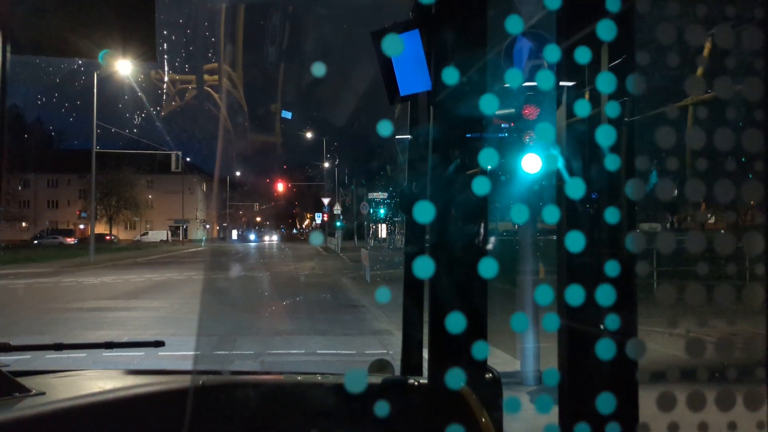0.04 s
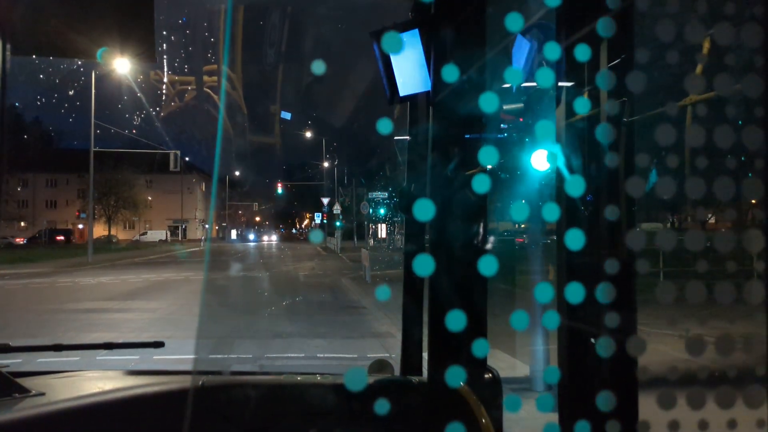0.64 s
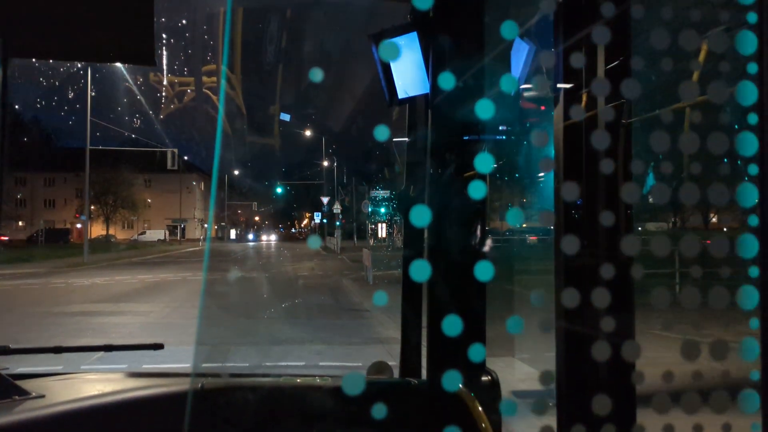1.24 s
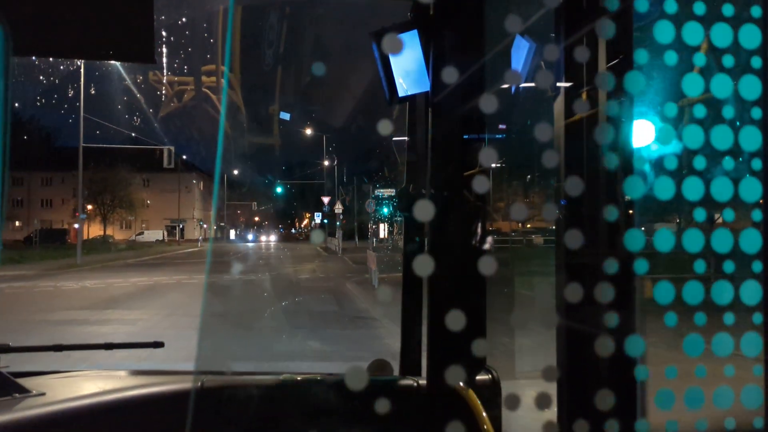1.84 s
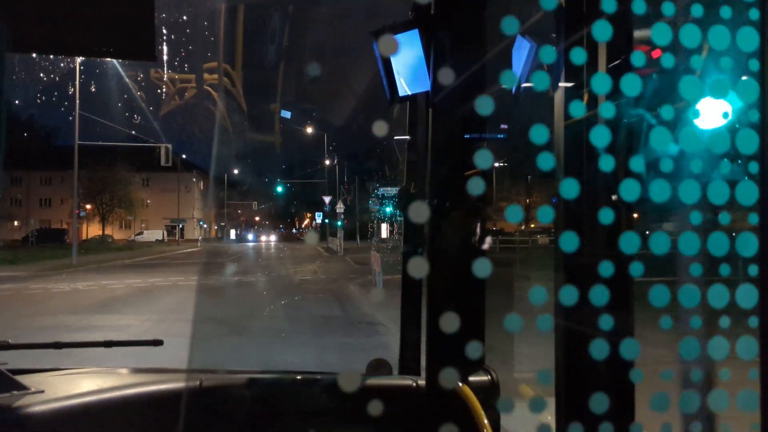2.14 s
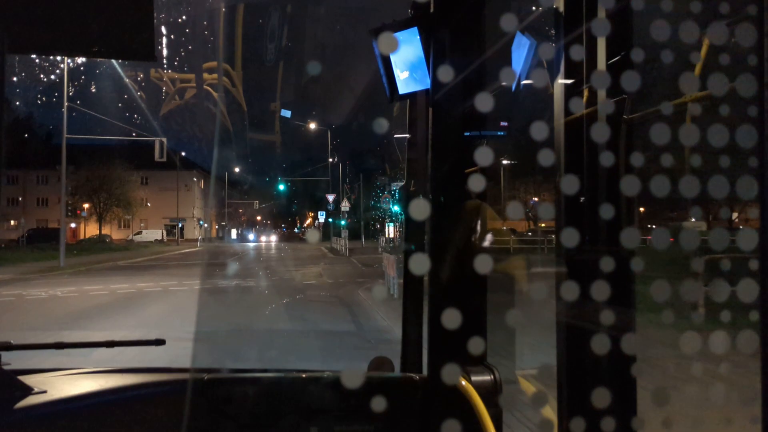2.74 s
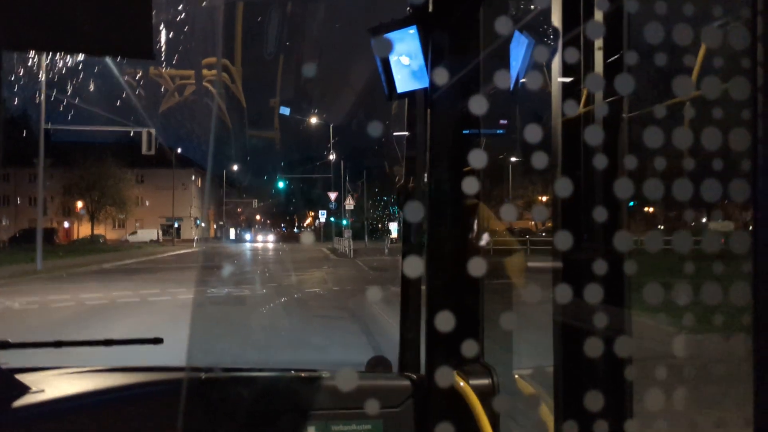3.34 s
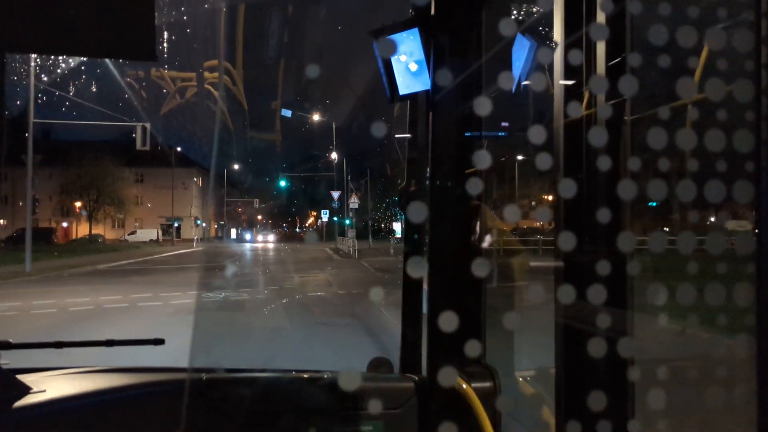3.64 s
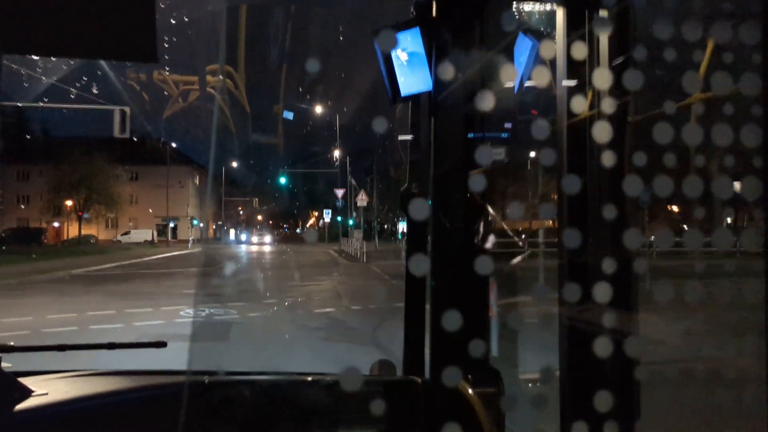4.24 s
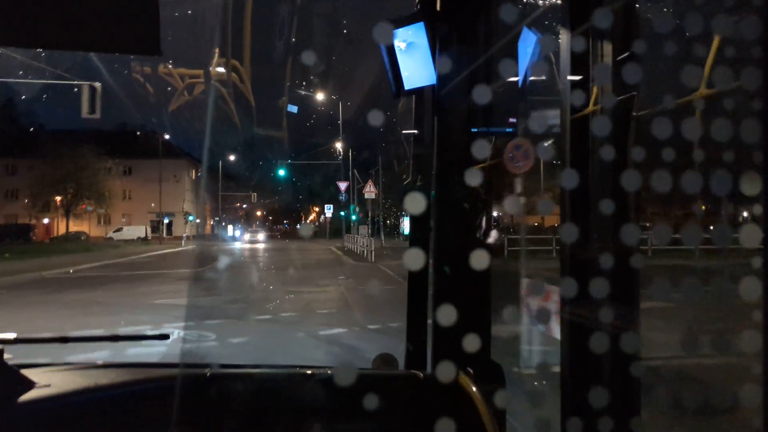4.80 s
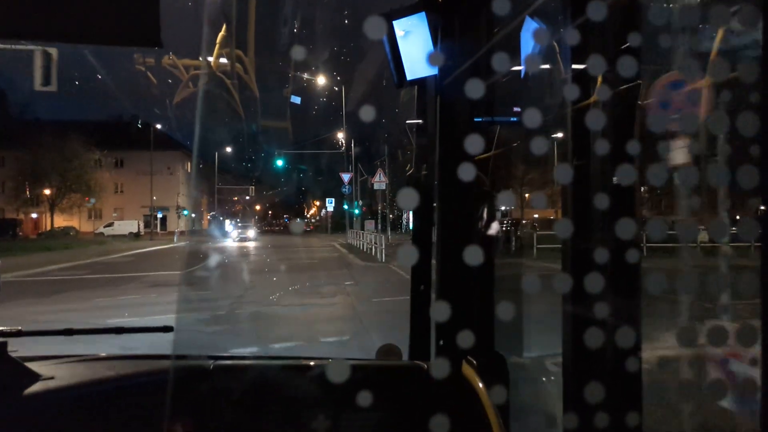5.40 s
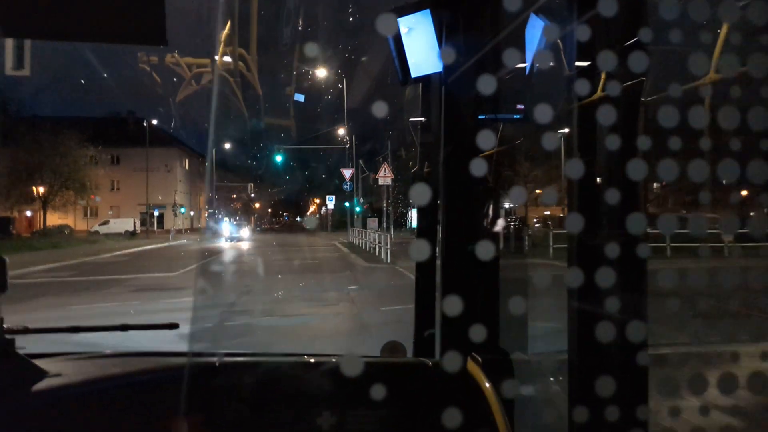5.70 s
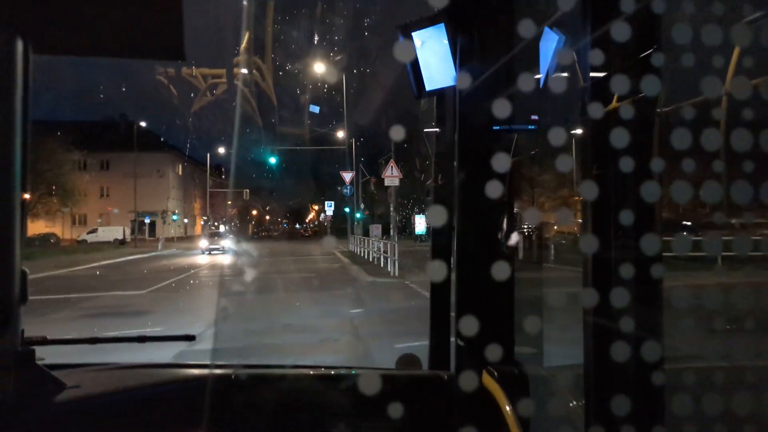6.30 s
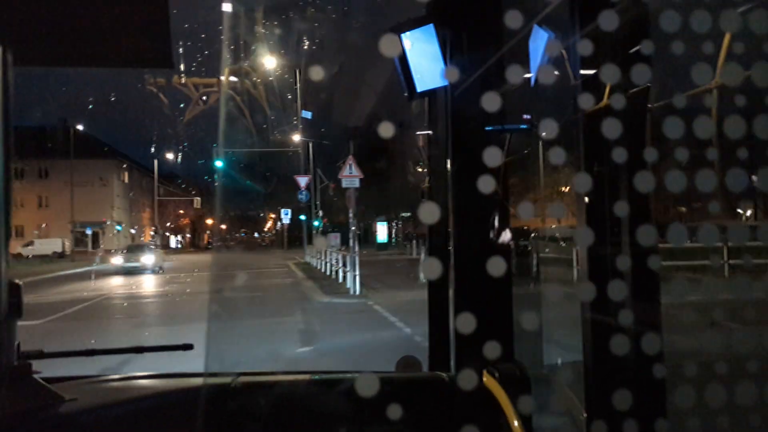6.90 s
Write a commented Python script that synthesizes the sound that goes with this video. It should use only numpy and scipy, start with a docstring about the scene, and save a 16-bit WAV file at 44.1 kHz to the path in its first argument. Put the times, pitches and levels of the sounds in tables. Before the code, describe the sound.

Inside a city bus, the engine booms up through a gear and shifts, over tyre rumble, whining ventilation and ticking door fittings.

```python
"""A city bus engine, heard from inside near the front door, pulls up through a gear and shifts up,
booming as its orders sweep through the cabin's standing waves. The tyres rumble and thump over seams.
A ventilation blower hisses and whines, sagging a little after the shift. Loose door fittings tick,
a rubber seal squeaks on glass and the latch snaps near the end."""
import sys
import numpy as np
from scipy import signal
from scipy.io import wavfile

SR = 44100
rng = np.random.default_rng(int(sys.argv[2]) if len(sys.argv) > 2 else 0)


def waveform_to_disk(signal):
    """Save audio, clipped to [-1, 1], as 16-bit WAV at the path in sys.argv[1]."""
    frames = np.transpose(np.atleast_2d(signal))
    scaled = np.clip(frames, -1, 1) * 32767
    samples = np.round(scaled).astype(np.int16)
    wavfile.write(sys.argv[1], SR, samples)


N = 315315
CUTOFF_HZ = 15550

# roughness of the asphalt: (time [s], rumble level [dB])
ROAD_ROUGHNESS = [(0, -32.5), (1.2, -34.5), (2.2, -31.5), (2.65, -26), (3.1, -30.5), (3.35, -23),
                  (3.9, -25), (4.3, -21.5), (5, -26.5), (5.7, -29.5), (5.9, -29.5), (6.5, -28.5),
                  (6.85, -28), (7.15, -30)]
# wheels hitting seams in the road: (time [s], strength [dB])
SEAMS = [(3.309, -11.5), (3.383, -23), (3.445, -14.5), (4.429, -15.5), (4.503, -12.5), (4.747, -17),
         (5.173, -11.5), (5.231, -10), (5.299, -17.5), (5.381, -14), (5.682, -17), (6.118, -11.5),
         (6.171, -12.5)]
# wall panel resonance that colours the engine: (frequency [Hz], width [Hz], boost [dB])
WALL_PANEL = (324, 36, 13)


def from_db(db):
    """Decibels to gain."""
    return 10 ** (np.asarray(db) / 20)


def rms_one(x):
    """Scale to an rms of 1."""
    return x / np.sqrt(np.mean(x ** 2) + 1e-20)


def in_time(rows):
    """Each column of an automation curve at every sample."""
    times, *columns = np.transpose(rows)
    return [np.interp(np.arange(N) / SR, times, column) for column in columns]


def at_hz(points, hz):
    """Read a spectrum on a log-frequency axis."""
    freqs, values = np.transpose(points)
    return np.interp(np.log(hz), np.log(freqs), values)


def pan(db):
    """Left and right gains for a level difference."""
    return from_db(np.array([[.5], [-.5]]) * db)


def drift(rate):
    """Smooth random modulation, rms 1, rolling off above about `rate` Hz."""
    hop, settle = 40, 2000
    pole = np.exp(-2 * np.pi * hop * rate / SR)
    noise = rng.standard_normal(N // hop + settle + 2)
    slow = signal.lfilter([1], [1, -2 * pole, pole * pole], noise)[settle:]
    return np.interp(np.arange(N) / hop, np.arange(len(slow)), rms_one(slow))


def band(x, low, high, order=2):
    """Butterworth band-pass."""
    return signal.sosfilt(signal.butter(order, [low, high], "band", fs=SR, output="sos"), x + 1e-18)


def swell(start_s, attack_s, t60, hold_s=0):
    """Envelope that rises to 1, holds and dies away."""
    age = np.arange(N) / SR - start_s
    decay = from_db(-60 * np.maximum(age - attack_s - hold_s, 0) / t60)
    return np.clip(age / attack_s, 0, 1) ** 2 * decay


def cabin_noise(spectrum, flicker_db):
    """Flickering third-octave noise bands, nearly mono in the bass and diffuse in the treble; rms 1."""
    # stereo image of the cabin: (frequency [Hz], left-right correlation [-1..1])
    likeness = [(60, .993), (130, .965), (250, .68), (550, 0.3), (1000, 0), (1500, -0.3), (2500, .05),
                (5000, -0.14), (14000, 0)]
    # its balance: (frequency [Hz], left over right [dB])
    balance = [(60, -1), (140, -1.5), (300, 3), (600, -1), (1300, 0.2), (2800, 0.5), (5500, 0.5), (9000, 0),
               (13000, -2)]
    edges = 25 * 2 ** (np.arange(29) / 3)
    white, out = rng.standard_normal((2, 2, N)), 0
    for k, (low, high) in enumerate(zip(edges, edges[1:])):
        hz = np.sqrt(low * high)
        if spectrum[0][0] <= hz <= spectrum[-1][0]:
            mid, side = band(white[k % 2], low, high, order=3)
            alike = at_hz(likeness, hz)
            gain = from_db(at_hz(spectrum, hz) + flicker_db * drift(20)) * pan(at_hz(balance, hz))
            out = out + gain * (np.sqrt(1 + alike) * mid + np.sqrt(1 - alike) * side * [[1], [-1]])
    return rms_one(out)


def cabin_reverb(x, t60, wet_db):
    """Direct sound plus a dense tail of reflections off glass and panels, different at each side."""
    t = np.arange(SR // 2) / SR
    tails = rng.standard_normal((2, len(t))) * from_db(-60 * t / t60)
    tails /= np.sqrt(np.sum(tails ** 2, axis=1, keepdims=True))
    return x + from_db(wet_db) * signal.fftconvolve(x, tails, axes=1)[:, :N]


def blower_shaft(wobble=0.000314):
    """The blower's own clock [s], which falls behind as it slows, and how far it has sagged (0-1)."""
    # blower motor speed: (time [s], share of full speed [0..1])
    speed_curve = [(0, 1), (4.65, 1), (4.8, .9925), (5.5, .9872), (7.15, .9865)]
    speed, = in_time(speed_curve)
    clock = np.cumsum(speed * (1 + wobble * drift(3.33))) / SR
    return clock, (1 - speed) / (1 - speed.min())


def motor_buzz(rush, clock, slowed, shaft_hz=54.65, low_hz=2600, size=4096):
    """Part of the hiss repeats on every turn of the motor: a comb of fine lines in the treble."""
    treble = signal.sosfiltfilt(signal.butter(3, low_hz, "high", fs=SR, output="sos"), rush)
    one_turn = signal.resample(treble[:, SR:SR + round(SR / shaft_hz)], size, axis=1)
    turns = clock * shaft_hz
    buzz = np.array([np.interp(turns, np.arange(size) / size, side, period=1) for side in one_turn])
    share = .41 - .12 * slowed   # of the treble's power
    return rush + (np.sqrt(1 - share) - 1) * treble + np.sqrt(share) * buzz


def vent_air(clock, slowed, level_db=-39, follows_road=0.11, treble_hz=6500):
    """Air rush and motor buzz leave through the vents, which colour them; rough road adds a little."""
    # spectrum of the air rush: (frequency [Hz], relative density [dB])
    rush_spectrum = [(200, 3), (450, -3), (600, 1), (800, -4), (1080, 1), (1400, -5), (1750, -6),
                     (2200, -9), (2850, -14.5), (4400, -15.5), (5700, -19.5), (9200, -27), (12000, -30.5),
                     (15500, -35)]
    # vent resonances: (frequency [Hz], width [Hz], boost [dB])
    vent_peaks = [(1540, 70, 5), (3970, 650, 0.5), (4750, 400, 2), (6620, 980, 4.5), (10800, 900, 5.5),
                  (13350, 1200, 7)]
    # the hiss brightens and dulls: (time [s], treble gain [dB])
    brightness = [(0, -0.3), (1.7, 2.1), (3.05, 1), (3.14, -1), (3.27, -1), (3.35, 2), (3.6, 1.5),
                  (4.4, 0.5), (5.2, -0.5), (5.8, -1), (6.4, -2), (7.15, -1)]
    road_db, = in_time(ROAD_ROUGHNESS)
    lift_db, = in_time(brightness)
    flow_db = level_db + follows_road * (road_db - road_db.mean())
    rush = motor_buzz(cabin_noise(rush_spectrum, flicker_db=1), clock, slowed)
    for hz, width, db in vent_peaks:
        rush = rush + (from_db(db) - 1) * band(rush, hz - width / 2, hz + width / 2, order=1)
    treble = signal.sosfilt(signal.butter(1, treble_hz, "high", fs=SR, output="sos"), rush)
    return from_db(flow_db) * (rush + (from_db(lift_db) - 1) * treble)


def blower_whine(clock, slowed, trim_db=-0.7, tilt_db_per_octave=0.67, waver_db=1.1, flutter_db=1.5):
    """Wavering tones ride on one shaft speed, and close pairs beat."""
    # blower tones: (full-speed pitch [Hz], full-speed level [dB], slowed level [dB],
    # left over right [dB], left phase lead [rad])
    tones = [(533, -57, -59, -2, -0.1), (652, -56, -51.5, -3, 1.0), (664, -46, -45.2, 3, -0.2),
             (780, -53, -55, 2, -2.3), (889, -61, -60, -6, -0.8), (949, -58, -62, 1, 0.9),
             (1008, -53, -56, 2, -2.5), (1060, -56, -53, -3, -0.5), (1067, -58, -55, -3, -0.6),
             (1328, -56, -58, -3, 3.0), (1363, -57, -71, 0, -3.0), (1384, -52, -49, 2, -2.7),
             (1482, -51, -47.3, 1, -1.1), (1518, -54, -54, -6, 2.9), (1625, -52, -53.5, -4, -0.9),
             (1933, -62, -73, 0, 1.1), (2074, -64, -68, -2, 0.5), (2196, -63, -62, 2, -1.5),
             (3322, -66, -72, 1, 1.7), (3498, -68, -72, 1, 0.9), (3655, -64.5, -69.5, 11, -0.8),
             (3908, -66, -67, 1, 1.0), (3988, -59.5, -67.5, -1, -0.8), (4043, -65, -76, 4, 1.4),
             (4209, -64, -66, 3, -1.8), (4322, -61, -65, 2, -1.9), (4564, -68, -68, 4, -0.7),
             (4802, -69, -71, -4, 1.6), (4861, -70, -72, 0, 0), (4919, -65, -70, 5, -0.6)]
    out = np.zeros((2, N))
    for hz, full_db, slow_db, side_db, lead in tones:
        phase = 2 * np.pi * (hz * clock + rng.random()) + 0.084 * drift(6)
        db = full_db + (slow_db - full_db) * slowed
        db += trim_db + tilt_db_per_octave * np.log2(hz / 1000)
        if hz > 3000:   # high tones start stronger and slowly fade
            db += 0.5 - 0.16 * clock
        if hz < 1700:   # low tones flutter once the motor has slowed
            db += flutter_db * slowed * drift(8.7)
        waver = waver_db * np.array([drift(3.6), drift(1.7)])
        out += from_db(db + waver) * pan(side_db) * np.sin([phase + lead, phase])
    return np.sqrt(2) * out


def blower_throb(clock, pitch_hz=4093, partner_db=-8):
    """A close pair of high blower tones beats slowly at first, then flutters as they drift apart."""
    # throb of the pair: (time [s], beat rate [Hz], level [dB])
    throb = [(0, 7.8, -55.5), (.3, 7, -55), (.57, 5, -53.5), (.8, 4.3, -56.5), (1.1, 4.3, -57.5),
             (2, 9, -59), (2.6, 15, -59.5), (4.6, 15, -59), (4.9, 15, -65), (7.15, 15, -66)]
    # phases at the left, then the right: (tone [rad], beat [rad])
    side_phases = [(1.9, 0), (0, 2)]
    beat_hz, db = in_time(throb)
    phase = 2 * np.pi * pitch_hz * clock
    beat = 2 * np.pi * np.cumsum(beat_hz) / SR
    pair = np.array([np.sin(phase + lead) + from_db(partner_db) * np.sin(phase + lead + beat + offset)
                     for lead, offset in side_phases])
    return np.sqrt(2) * from_db(db + drift(9.6)) * pan(4) * pair


def fitting_ticks(attack_share=0.0077):
    """Loose fittings knock: a noise burst around each part's pitch; longer shudders start softer."""
    # knocks of door fittings and panels:
    # (time [s], level [dB], centre [Hz], width [octaves], left over right [dB], t60 [s])
    knocks = [(.003, -32.5, 3650, 2.45, 3, 0.1), (1.177, -39, 7500, 1.2, 1, 0.073),
              (1.179, -42.5, 6600, 0.44, 1, .09), (1.18, -45, 10900, 0.12, -1, 0.1),
              (3.429, -44, 2200, 1, -2, 0.19), (3.539, -41, 2800, 0.99, 1, 0.12),
              (3.56, -38, 545, 0.8, 1, 0.56), (3.788, -34.5, 320, 0.92, -1, 0.58),
              (4.21, -46.5, 3280, 1.1, 2, 0.22), (5.349, -42, 3300, 1.1, -1, 0.12),
              (6.125, -36, 281, 1.1, 0, 0.34), (6.717, -42, 4500, 2.3, -6, 0.05),
              (6.721, -45, 2480, 1, 2, 0.14), (6.729, -45, 4800, 1.8, -1, .03),
              (6.752, -50, 10000, .6, 1, .03), (6.77, -40, 300, 1.3, 7, 0.25)]
    out, t = np.zeros((2, N + SR)), np.arange(SR // 4) / SR
    for start_s, db, hz, octaves, side_db, t60 in knocks:
        at, edge_ratio = int(start_s * SR), 2 ** (octaves / 2)
        envelope = (1 - np.exp(-t / (attack_share * t60))) * from_db(-60 * t / t60)
        burst = rms_one(band(rng.standard_normal((2, len(t))), hz / edge_ratio, hz * edge_ratio))
        out[:, at:at + len(t)] += from_db(db) * pan(side_db) * envelope * burst
    return out[:, :N]


def seal_squeak(sag_hz_per_s=250, jitter=.014, octave_db=-12, rub_db=-48.5):
    """Rubber sticks and slips on glass: an unsteady tone, its octave and a hiss that outlasts them."""
    # the door seal's one squeak: (time [s], pitch [Hz], level [dB])
    squeak = (5.283, 4795, -47)
    start_s, pitch_hz, db = squeak
    hz = pitch_hz - sag_hz_per_s * np.maximum(np.arange(N) / SR - start_s, 0)
    phase = 2 * np.pi * np.cumsum(hz * (1 + jitter * drift(96))) / SR
    tone = from_db(db + 2 * drift(50)) * (np.sin(phase) + from_db(octave_db) * np.sin(2 * phase))
    tone *= swell(start_s, attack_s=.025, t60=.42, hold_s=.05)
    rub = from_db(rub_db) * rms_one(band(rng.standard_normal((2, N)), 2500, 13000, order=1))
    rub *= swell(start_s, attack_s=.04, t60=.75)
    return (tone + rub) * pan(2.2)


def door_latch(ring_db=-13):
    """The latch snaps: each contact gives a dry crack, a duller clack from the frame and a short ring."""
    # strike and rebounds: (time [s], level [dB])
    contacts = [(7.0289, -33.5), (7.0316, -29.5), (7.038, -37)]
    # ringing modes of the latch: (frequency [Hz], level [dB], t60 [s])
    modes = [(3106, -4, .04), (4506, -4, .04), (5790, -2, .05), (7768, -3, .04), (10580, -4, .04),
             (12660, -2, .04)]
    out, t = np.zeros((2, N + SR)), np.arange(SR // 4) / SR

    def burst(low_hz, high_hz, db, t60):
        noise = rms_one(band(rng.standard_normal((2, len(t))), low_hz, high_hz))
        return noise * from_db(db - 60 * t / t60)

    for start_s, db in contacts:
        crack = burst(4500, CUTOFF_HZ, db=-3, t60=0.044)
        clack = burst(1500, 4500, db=-8, t60=0.12)
        ring = 0
        for hz, mode_db, t60 in modes:
            phase = 2 * np.pi * (hz * t + rng.random((2, 1)))
            ring = ring + from_db(ring_db + mode_db - 60 * t / t60) * np.sin(phase)
        at = int(start_s * SR)
        out[:, at:at + len(t)] += from_db(db) * (crack + clack + ring)
    return out[:, :N] * pan(-2)


def tyre_rumble(trim_db=-1.5, jolt_s=0.017, shudder_db=-16.5, shudder_decay_s=0.11):
    """Tyre rumble follows the roughness of the asphalt and flares as the body shudders at each seam."""
    # spectrum of the rumble: (frequency [Hz], relative density [dB])
    rumble_spectrum = [(25, -40), (36, -41), (48, -16), (62, 5.5), (85, 0.5), (115, 0), (150, -1.5),
                       (200, -17.5), (250, -11), (310, -31), (400, -23), (700, -26), (1500, -71)]
    road_db, = in_time(ROAD_ROUGHNESS)
    t60 = shudder_decay_s * np.log(1000)
    shudder_power = sum((from_db(db + shudder_db) * swell(hit_s - jolt_s, jolt_s, t60)) ** 2
                        for hit_s, db in SEAMS)
    envelope = np.sqrt(from_db(road_db + trim_db) ** 2 + shudder_power)
    return envelope * cabin_noise(rumble_spectrum, flicker_db=3)


def seam_thumps(trim_db=-3, cushion_hz=170):
    """Each seam in the road, cushioned by the tyres, sets the floor and walls ringing briefly."""
    # floor and wall modes: (frequency [Hz], level [dB], t60 [s])
    body_modes = [(67, -29, 0.097), (102, 8.5, 0.019), (139, -8.5, 0.045), (232.4, -10, 0.42)]
    blows, t = np.zeros(N), np.arange(SR // 2) / SR
    for hit_s, db in SEAMS:
        blows[int(hit_s * SR)] = from_db(db + trim_db)
    ring = sum(from_db(db - 60 * t / t60) * np.sin(2 * np.pi * hz * t) for hz, db, t60 in body_modes)
    return band(signal.fftconvolve(blows, ring)[:N], 39, cushion_hz)


def combustion_roar(phase, load_db, roar_db=-23.5, pulse_depth=0.47, hum_db=-50.7, hum_follows=.4):
    """Combustion noise pulses with each firing and keeps the wall panel humming at its own pitch."""
    panel_hz, width, _ = WALL_PANEL
    noise = rng.standard_normal(N)
    roar = from_db(load_db + roar_db) * rms_one(band(noise, 290, 910))
    hum = rms_one(band(noise, panel_hz - width / 2, panel_hz + width / 2))
    hum_gain = from_db(hum_db + hum_follows * (load_db - load_db.mean()))
    return roar * (1 + pulse_depth * np.sin(phase)) + hum_gain * hum


def engine(cruise_hz=72, wobble=0.0032, shake_db=1.5, uneven_db=1.8, blur_rad=0.19):
    """The rear engine's low orders boom in the cabin; uneven firing blurs the higher ones."""
    # revs, climbing through a gear and dropping at the shift: (time [s], firing rate [Hz])
    revs = [(0, 42), (.85, 55), (1.6, 72.7), (2, 80), (3, 96), (3.3, 100), (3.82, 104.7), (4.1, 99),
            (4.4, 80), (4.9, 66), (6.3, 73), (7.15, 74)]
    # pull on the engine, slackening mid-gear and eased at the shift: (time [s], level [dB])
    pull = [(0, -41.5), (.8, -40.5), (1.3, -34), (1.6, -28.5), (2.05, -33), (2.4, -39), (2.85, -33),
            (3.3, -26.5), (4.05, -28.5), (4.17, -39.5), (4.35, -34), (4.7, -39.5), (7.15, -44.5)]
    # drone: (order [x firing rate], level [dB], change with revs [dB/octave])
    drone_orders = [(1, 2, 0), (1.5, -4, -8.5), (2, -6, 13.5)]
    # growl: (order [x firing rate], level [dB])
    growl_orders = [(2.5, -3), (3, -2.5), (3.5, -6), (4, -5.5), (5, -9)]
    # standing waves of the cabin, which the drone sweeps through: (frequency [Hz], gain [dB])
    cabin_boom = [(42, -26), (54, 4), (59, 4), (65, 4), (71, -5.5), (79, -1), (85, -3.5), (94, 0),
                  (104, 8.5), (113, 1), (123, 10), (135, 3), (150, -3.5), (172, -2), (190, -12), (199, -27),
                  (210, -10)]
    firing_hz, = in_time(revs)
    load_db, = in_time(pull)
    panel_hz, width, panel_db = WALL_PANEL
    octaves = np.log2(firing_hz / cruise_hz)
    phase = 2 * np.pi * np.cumsum(firing_hz * (1 + wobble * drift(17))) / SR
    drone = [(order, load_db + db + slope * octaves + at_hz(cabin_boom, order * firing_hz))
             for order, db, slope in drone_orders]
    growl_db = -57.5 + 0.27 * (load_db - load_db.mean())   # follows the pull only gently
    growl = [(order, growl_db + db) for order, db in growl_orders]
    tones = 0
    for order, db in drone + growl:
        lift_db = panel_db / (1 + ((order * firing_hz - panel_hz) / (width / 2)) ** 2)
        waver_db = (order > 1) * shake_db * drift(5.4)
        waver_db += uneven_db * np.minimum(cruise_hz / firing_hz, 1) * drift(29)   # lumpier at low revs
        blur = blur_rad * (order - 1) * drift(32) + 2 * np.pi * rng.random()
        tones = tones + from_db(db + lift_db + waver_db) * np.sin(order * phase + blur)
    return np.sqrt(2) * tones * pan(-0.51) + combustion_roar(phase, load_db) * pan(1.5)


def scene():
    """Engine and road under the ventilation, with door noises reflecting around the cabin."""
    clock, slowed = blower_shaft()
    door = cabin_reverb(fitting_ticks(), t60=0.38, wet_db=-0.5)
    door += cabin_reverb(seal_squeak(), t60=0.17, wet_db=-13)
    door += cabin_reverb(door_latch(), t60=0.17, wet_db=-7)   # close by, so a short, weak tail
    drive = engine() + tyre_rumble() + seam_thumps()
    ventilation = blower_whine(clock, slowed) + blower_throb(clock) + vent_air(clock, slowed)
    return drive + ventilation + door


def record(dry):
    """The microphone drops the deepest bass; the top is cut steeply."""
    thin = signal.sosfilt(signal.butter(6, 41, "high", fs=SR, output="sos"), dry)
    return signal.sosfilt(signal.ellip(10, .1, 80, CUTOFF_HZ, fs=SR, output="sos"), thin)


dry = scene()
out = record(dry)
waveform_to_disk(out)
```